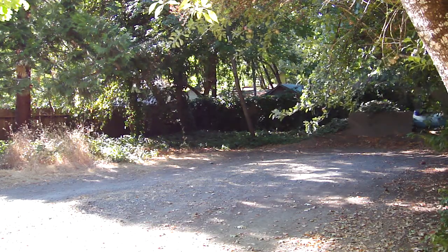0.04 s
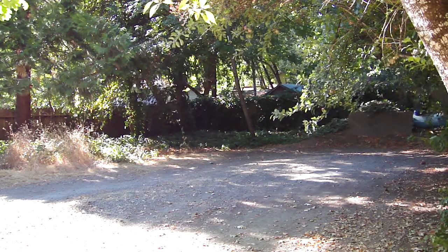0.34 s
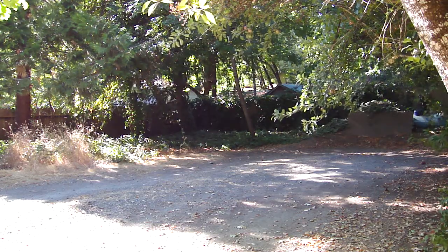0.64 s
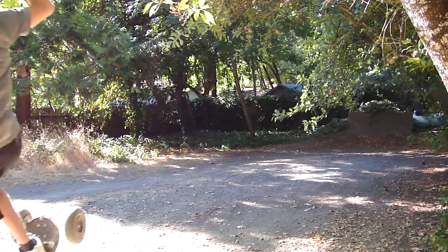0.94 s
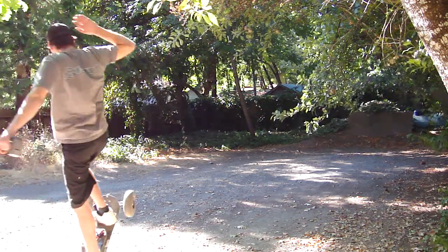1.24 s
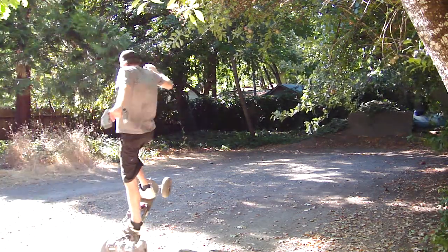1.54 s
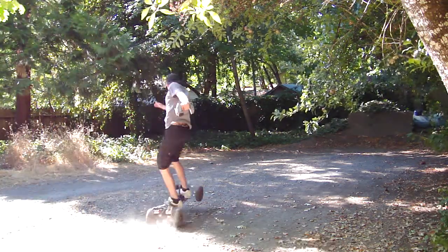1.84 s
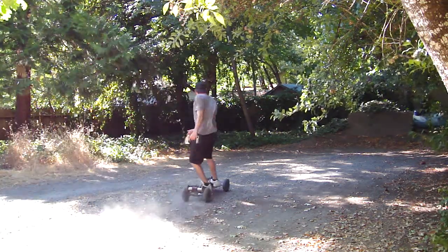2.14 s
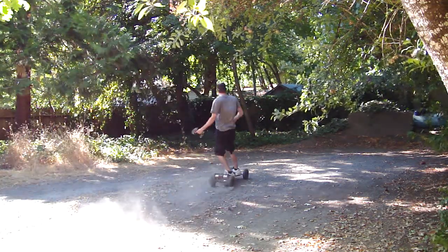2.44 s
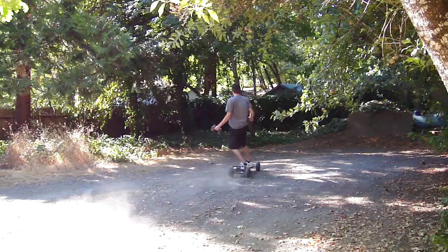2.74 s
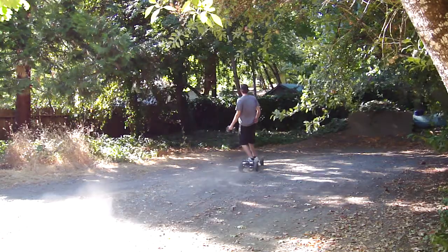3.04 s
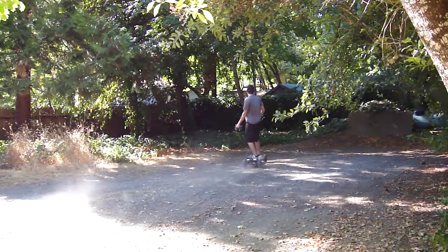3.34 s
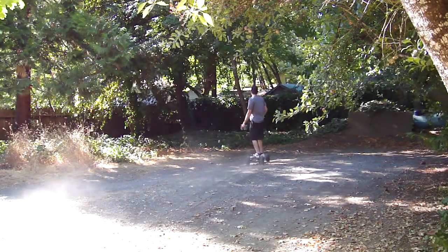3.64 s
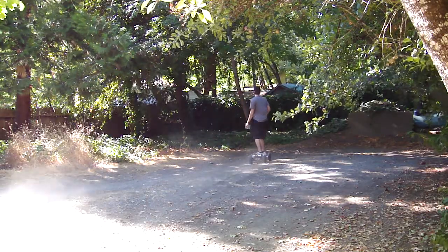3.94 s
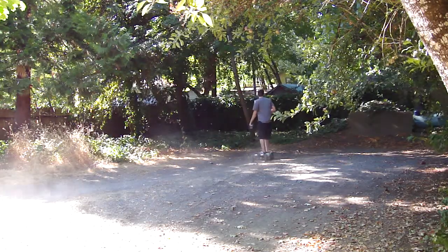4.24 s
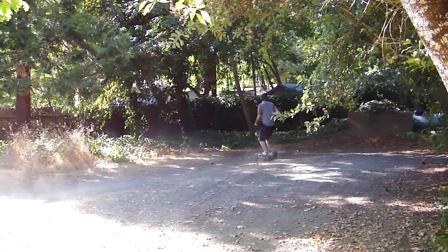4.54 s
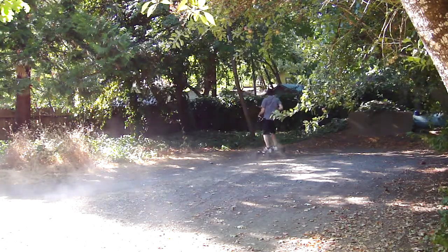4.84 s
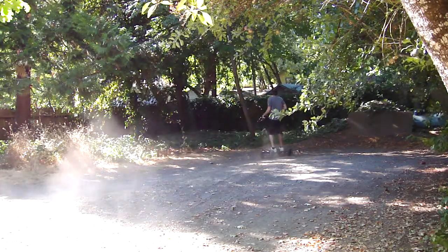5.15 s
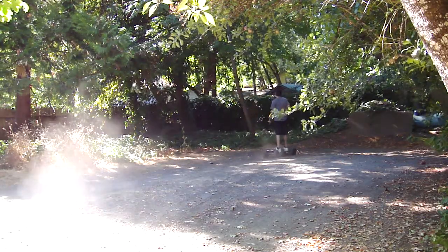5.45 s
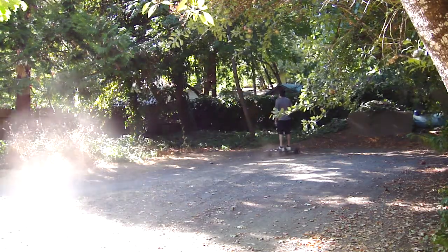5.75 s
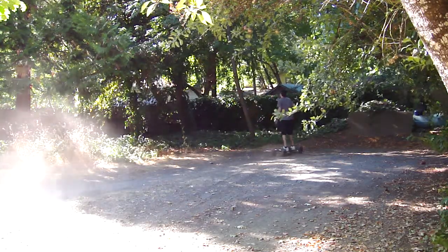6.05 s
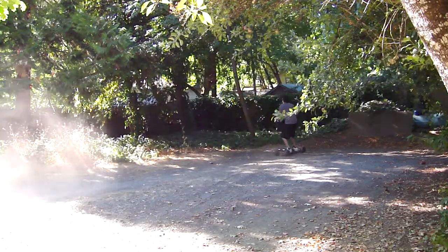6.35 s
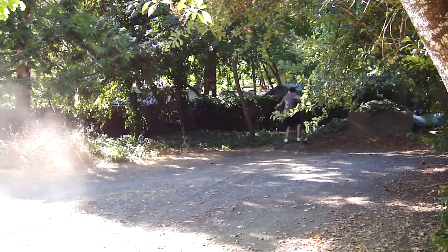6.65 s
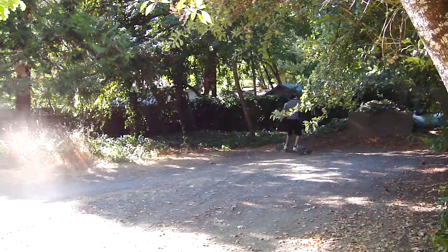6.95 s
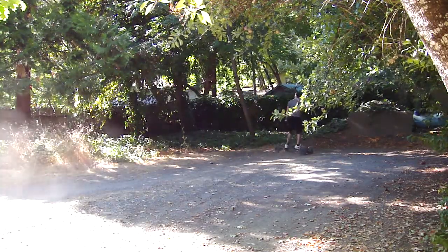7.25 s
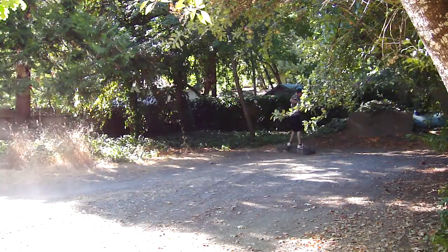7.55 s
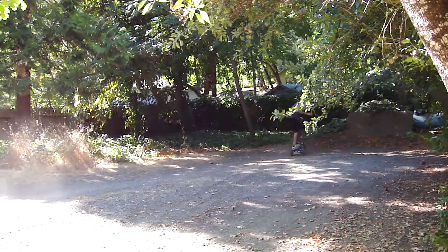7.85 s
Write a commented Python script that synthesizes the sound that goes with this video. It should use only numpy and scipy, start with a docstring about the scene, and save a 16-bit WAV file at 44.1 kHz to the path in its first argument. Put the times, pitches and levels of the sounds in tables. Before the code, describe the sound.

Close by, an electric board accelerates over crunching gravel, whining and clattering into the distance, before feet shift softly on the stones.

```python
"""A gravel lot, one camera microphone, a steady rush in the distance. Close by, an electric mountainboard
pulls away in three main bursts of throttle: the tyres spray stones, the drive whines upward, the deck
clatters, the motor hums and squeals. From about 2 s the speed controller sings in the windings until the
throttle closes, and the board coasts far off. Then a small bird chips, feet shift on the gravel nearby,
pebbles snap and the microphone is bumped. A thin, high flicker near 7.4 and 10 kHz comes and goes."""
import sys
import numpy as np
from scipy import signal
from scipy.fft import rfft, irfft, next_fast_len
from scipy.io import wavfile
from scipy.ndimage import map_coordinates

SR = 44100
rng = np.random.default_rng(int(sys.argv[2]) if len(sys.argv) > 2 else 0)


def unload_audio(sound):
    """Save the sound as a 16-bit wav file, at the path given as the first command line argument."""
    columns = np.transpose(np.atleast_2d(sound))
    # keep every value between -1 and 1, then stretch to whole-number steps
    steps = np.round(np.clip(columns, -1, 1) * 32767)
    wavfile.write(sys.argv[1], SR, steps.astype(np.int16))


N = 357210

# the board rolls past the microphone and away:
# (time [s], rumble [dB], crunch [dB], stone spray [dB], housing rasp [dB])
ROLL = [(0.0, -32, -40.5, -50.5, -57), (.2, -33.5, -38.5, -49.5, -54), (.5, -32.5, -39.5, -46, -48),
        (.6, -30, -37.5, -41.5, -40), (.85, -36, -32.5, -37.5, -31), (1.15, -36, -35, -39, -28.5),
        (2.0, -34.5, -36, -42.5, -31), (2.2, -37.5, -39, -43.5, -28), (2.42, -32, -37, -49.5, -35),
        (2.6, -32.5, -39.5, -52, -59), (2.82, -38, -42.5, -51.5, -71), (3.25, -43, -45, -55, -80),
        (3.55, -52, -71, -56.5, -88), (3.95, -55, -58, -64.5, -90)]
# bursts of throttle: (start [s], end [s], first rasp [dB], last rasp [dB], wheelspin [dB])
BURSTS = [(-.03, 0.021, -39, -47, 5.5), (0.176, 0.43, -25.5, -35.5, 3.5), (0.555, 1.01, -29.5, -35, 4),
          (1.187, 1.873, -25, -26, 2.5), (2.135, 2.262, -38, -26.5, -1.1)]
# spectrum of fine flying stones: (frequency [Hz], level [dB])
SPRAY = [(2000, -6), (4000, 7.5), (5200, -0.5), (6300, 0), (7300, 3), (8300, -0.5), (10000, 0.5),
         (11000, -3.5)]
ATTACK_S, RELEASE_S = 0.012, 0.017  # the drive takes up and drops its load
TIME = np.arange(N) / SR


def amp(db):
    return 10 ** (np.asarray(db) / 20)


def unit(x):
    return x / np.sqrt(np.mean(x ** 2) + 1e-20)


def noise():
    return rng.standard_normal(N)


def curves(rows):
    """One value per sample for each column after the time."""
    times, *columns = np.transpose(rows)
    return [np.interp(TIME, times, column) for column in columns]


def ramp(start, end, first, last):
    """A value that moves steadily from first to last between two times."""
    return first + (last - first) * np.clip((TIME - start) / max(end - start, 1 / SR), 0, 1)


def held(start, end, attack=ATTACK_S, release=RELEASE_S):
    """An envelope that rises at start, holds, and dies away after end."""
    return np.clip((TIME - start) / attack, 0, 1) * np.exp(-np.clip((TIME - end) / release, 0, 20))


def swell(s, rise, fade):
    """An envelope that peaks at s and dies away."""
    t = TIME - s
    return np.exp(-np.minimum(np.where(t < 0, (t / rise) ** 2, t / fade), 20))


def wobble(rate):
    """A smooth random curve, rate knots a second."""
    knots = rng.standard_normal(N // 8)
    return map_coordinates(knots, [TIME * rate], mode="wrap")


def filtered(x, response):
    """x times a response of frequency."""
    size = next_fast_len(N + SR // 2)
    return irfft(rfft(x, size) * response(np.fft.rfftfreq(size, 1 / SR)), size)[:N]


def coloured(x, points):
    """x shaped by (frequency [Hz], level [dB]) points with steep ends, at rms 1."""
    f, db = np.transpose(points)
    edges = np.log(np.r_[f[0] / 10, f[0] / 2, f, f[-1] * 2])
    levels = np.r_[db[0] - 50, db[0] - 20, db, db[-1] - 20]
    return unit(filtered(x, lambda hz: amp(np.interp(np.log(hz + 1), edges, levels))))


def low_cut(x, hz):
    return signal.sosfilt(signal.butter(2, hz, "highpass", fs=SR, output="sos"), x)


def grains(rate, spread_db):
    """Tiny contacts of varied size at random times, about rate a second."""
    size_db = spread_db * np.minimum(rng.exponential(size=N), 4)
    return unit((rng.random(N) < rate / SR) * amp(size_db) * np.sign(noise()))


def tone(hz, rough, width_hz):
    """A steady or gliding line of rms 1; the share rough of it is scattered over width_hz."""
    rough = np.clip(rough, 0, 1)
    phasor = np.sqrt(1 - rough) + np.sqrt(rough / 2) * (wobble(width_hz) + 1j * wobble(width_hz))
    cycles = np.cumsum(np.broadcast_to(hz, N)) / SR + rng.random()
    return np.sqrt(2) * np.real(phasor * np.exp(2j * np.pi * cycles))


def distant_rush():
    """The bed of the lot: a far rush that grows a little late on, with faint ticks of grit."""
    # spectrum of the rush: (frequency [Hz], level [dB])
    air = [(25, -34), (60, -21), (130, -16.5), (280, -10), (450, -4), (650, -1.5), (900, 0), (1200, 0.5),
           (1650, -1.5), (2400, -5), (4000, -17.5), (6300, -26.5), (8000, -28.5), (11000, -32)]
    db = -42.5 + ramp(4.7, 7.3, 0, 2)
    rush = amp(db + 0.36 * wobble(8)) * coloured(noise(), air)
    ticks = amp(-68.5 + 7.6 * wobble(4.48)) * coloured(grains(rate=200, spread_db=2), SPRAY)
    return rush + ticks


def tyres():
    """Knobbly tyres drum on the ground, crush gravel and fling fine stones, more when the wheels spin."""
    # tread drumming on the ground: (frequency [Hz], level [dB])
    tread = [(30, -56), (80, -32.5), (160, -16), (300, -7), (450, -2.5), (680, 2), (1000, -0.5), (1190, 3),
             (1400, -2), (1800, -6), (3000, -35)]
    # gravel crushed under the tread: (frequency [Hz], level [dB])
    gravel = [(500, -5.5), (1100, -7.5), (1600, 1.5), (2200, 2.5), (3000, -2), (4500, -11), (6000, -19.5),
              (9000, -52)]
    rumble_db, crunch_db, spray_db, _ = curves(ROLL)
    spin_db = sum(db * held(start, end) for start, end, *_, db in BURSTS)
    spin_db -= 1.5 * held(1.885, 1.922)  # a hop: the board unweights before it lands
    jolts = wobble(60)
    rumble_db += 0.9 * spin_db + 1.25 + 1.07 * jolts
    rumble = amp(rumble_db) * coloured(grains(rate=900, spread_db=0.5), tread)
    crunch_db += 1.05 * spin_db + 2 + 0.55 * jolts
    crunch = amp(crunch_db) * coloured(grains(rate=3500, spread_db=3), gravel)
    spray_db += spin_db + 6 + 1.4 * wobble(40.5)
    spray = amp(spray_db) * coloured(grains(rate=9000, spread_db=3), SPRAY)
    in_earshot = held(-ATTACK_S, 3.98, release=0.094)  # the tyres sink into the distant rush
    return (rumble + crunch + spray) * in_earshot


def housing():
    """Rapid ticks ring the motor housing, harder in each burst of throttle."""
    # resonances of the housing: (frequency [Hz], level [dB])
    resonances = [(1500, -44), (2500, -11), (3100, 2), (3500, 0), (3850, -1), (4250, -4), (4700, -9),
                  (5400, -16), (6500, -34), (7300, -16), (8200, -30)]
    *_, rolling_db = curves(ROLL)
    load = sum(amp(ramp(start, end, first_db, last_db)) * held(start, end)
               for start, end, first_db, last_db, _ in BURSTS)
    gain = np.hypot(amp(rolling_db - 4.5), amp(-3) * load)
    flutter = amp(0.82 * wobble(140) + 0.46 * wobble(21.57))
    return gain * flutter * coloured(grains(rate=5000, spread_db=2.5), resonances)


def feet():
    """Near the microphone a sole presses the gravel down and grit slides after it."""
    # shifts of the feet: (time [s], weight [dB], grit [dB], rise [s], fade of the weight [s])
    steps = [(.01, -51, -51.5, .01, 0.066), (4.21, -45.5, -45, 0.03, 0.1),
             (4.63, -47.5, -46.5, 0.12, 0.078), (5.02, -40.5, -45.5, 0.055, 0.083),
             (5.7, -63, -54.5, .05, 0.16), (6.31, -62, -52, .012, 0.066), (6.52, -54, -55, .04, 0.055),
             (6.884, -28, -42, 0.0027, 0.011), (6.91, -24.5, -43, 0.0094, 0.014),
             (6.943, -39.5, -45, 0.0089, 0.039), (7.15, -60, -59, .05, .15),
             (7.905, -32.5, -44.5, 0.0086, 0.012), (7.928, -29, -51, 0.0042, 0.014),
             (7.943, -31.5, -48, .003, .012), (7.962, -26.5, -42, 0.0059, 0.01),
             (7.977, -34, -42, 0.0044, 0.065)]
    # gravel under a sole: (frequency [Hz], level [dB])
    sole = [(29, -55), (50, -28), (225, -9), (280, -9.5), (402, -3), (989, -2), (1160, -6), (1260, -5),
            (1800, -7), (6000, -28), (7800, -51), (13200, -120)]
    # sliding grit: (frequency [Hz], level [dB])
    grit_spectrum = [(800, -13), (2000, 5), (3500, 0.5), (5000, -6), (7000, -9), (10500, -10.5)]
    weight = sum(amp(db) * swell(s, rise, fade) for s, db, _, rise, fade in steps)
    slide = sum(amp(db) * swell(s, rise, 1.98 * fade) for s, _, db, rise, fade in steps)
    grit = coloured(grains(rate=2000, spread_db=0.5), grit_spectrum)
    grit += amp(-11) * coloured(grains(rate=240, spread_db=2.5), SPRAY)
    return weight * coloured(grains(rate=3000, spread_db=3.5), sole) + slide * grit


def drive_whine():
    """The drive climbs in steps as the wheel grips and slips; its teeth grate and at speed it frays."""
    # the whine, one curve for each main burst: (time [s], tooth rate [Hz], level [dB])
    climbs = [
        [(0.18, 1017, -31), (0.19, 1028, -15), (0.244, 1099, -22), (0.266, 1149, -15), (0.288, 1177, -18.5),
         (0.3, 1223, -12), (0.338, 1332, -15.5), (0.358, 1335, -22), (0.368, 1340, -20), (0.398, 1330, -21),
         (0.408, 1290, -22), (0.43, 1268, -21), (0.44, 1236, -29)],
        [(0.56, 1100, -24.5), (0.622, 1199, -13), (0.658, 1235, -22.5), (0.682, 1314, -19.5),
         (0.692, 1393, -30), (0.73, 1524, -30), (0.746, 1394, -22), (0.764, 1452, -29), (0.788, 1651, -23),
         (0.824, 1618, -30.5), (0.942, 1732, -33), (0.95, 1787, -35), (1.02, 1749, -48)],
        [(1.2, 1347, -27.5), (1.26, 1475, -32), (1.372, 1404, -32), (1.388, 1568, -40), (1.418, 1470, -31),
         (1.462, 1632, -37), (1.496, 1456, -28.5), (1.548, 1709, -32), (1.566, 1597, -31), (1.618, 1750, -27),
         (1.634, 1642, -28.5), (1.784, 1775, -34), (1.82, 1884, -38)],
    ]
    # the drive is only nudged: (time [s], tooth rate [Hz], level [dB], rise [s], fade [s])
    nudges = [(.02, 1198, -26, 0.017, 0.015), (.503, 1202, -27, .003, .014)]
    hz, db = curves([row for climb in climbs for row in climb])
    gate = sum(held(climb[0][0] - 0.008, climb[-1][0], release=0.0087) for climb in climbs)
    fray = np.interp(hz, [1300, 1500], [0.18, 0.62])
    hz *= 1 + 0.012 * wobble(110)
    line = tone(hz, rough=fray, width_hz=200)
    grate = amp(-13.5) * tone(hz, rough=0.71, width_hz=750)
    octave = amp(-23) * tone(2 * hz, rough=0.91, width_hz=300)
    blips = sum(amp(level) * swell(s, rise, fade) * tone(pitch, rough=0.3, width_hz=200)
                for s, pitch, level, rise, fade in nudges)
    capped_db = np.minimum(db + 1 + 1.8 * wobble(69.6), -14)  # the whine's loudest peaks are capped
    return gate * amp(capped_db) * (line + grate + octave) + blips


def high_flicker():
    """A thin, high flicker near 7.4 and 10 kHz comes and goes."""
    # brief swells of the flicker: (time [s], level [dB], rise [s])
    pulses = [(.06, -48, 0.11), (0.51, -46, .04), (.885, -33, .012), (.95, -37, .02), (1.681, -36, 0.0093),
              (2.005, -41, .012), (2.12, -43, 0.012), (3.873, -60, .03), (4.062, -64, .05), (4.6, -62, .15),
              (5.12, -64, .06), (5.34, -59, 0.14), (6.2, -71, .2), (7.2, -68, .1)]
    envelope = sum(amp(db) * swell(s, rise, rise / 2) for s, db, rise in pulses)
    low = amp(-1 + 4.3 * wobble(70)) * tone(7420, rough=0.77, width_hz=430)
    high = amp(-5 + 4.6 * wobble(70)) * tone(9950, rough=1, width_hz=760)
    return envelope * (low + high)


def deck():
    """Each jolt is a short, dead clack with a ring of its own, a faint rattle and a thud of the tyre."""
    # the deck and axles knock: (time [s], level [dB], ring [Hz])
    knocks = [(.4, -8, 820), (.501, -15, 1200), (.543, -16, 900), (.547, -17, 1100), (.581, -6.5, 970),
              (.596, -12, 1148), (1.95, -7.5, 1340), (1.962, -3, 1338), (2.018, -16, 675),
              (2.038, -18, 530), (2.271, -17.5, 990), (2.32, -15.5, 1030), (2.375, -17, 396),
              (2.423, -17, 990), (2.452, -17, 1500), (2.474, -13, 1200), (2.497, -24, 1120),
              (2.575, -17, 520), (2.6, -14, 870), (2.649, -22, 1190), (2.703, -16.5, 616),
              (2.72, -14.5, 744), (2.783, -19, 1080), (2.835, -13.5, 1160), (2.846, -16, 800),
              (2.856, -24, 640), (2.924, -25, 950), (3.027, -18.5, 860), (3.048, -19.5, 1620),
              (3.077, -18, 1190), (3.108, -18, 680), (3.164, -19, 610), (3.185, -18, 1090),
              (3.205, -19.5, 1400), (3.254, -16.5, 1230), (3.272, -20.5, 520), (3.401, -21.5, 1320),
              (3.424, -23.5, 1040)]
    # the struck deck: (frequency [Hz], level [dB])
    deck_spectrum = [(100, -38), (220, -16), (350, -2), (700, -0.5), (1000, 1), (1190, 2.5), (1450, 0.5),
                     (2200, -3.5), (3200, -8.5), (6000, -21), (11000, -35)]
    # a struck tyre: (frequency [Hz], level [dB])
    tyre_spectrum = [(150, -33), (260, -10.5), (380, -2.5), (600, -5), (900, -1), (1600, -26)]
    blows, thuds, rings = np.zeros((3, N + SR))
    t = np.arange(SR // 5) / SR

    def strike(rise, fade):
        return (1 - np.exp(-(t / rise) ** 2)) * np.exp(-t / fade)

    for s, db, hz in knocks:
        span = slice(round(s * SR), round(s * SR) + len(t))
        rattle = amp(-17) * strike(rise=0.002, fade=0.027)
        blows[span] += amp(db) * (strike(rise=0.001, fade=0.0056) + rattle)
        thuds[span] += amp(min(db, -15)) * strike(rise=0.0017, fade=0.0095)
        ring = np.sqrt(2) * np.sin(2 * np.pi * (hz * t + rng.random()))
        rings[span] += amp(db) * strike(rise=0.0011, fade=0.0066) * ring
    clatter = amp(-10) * blows[:N] * coloured(noise(), deck_spectrum)
    clatter += amp(-13.5) * thuds[:N] * coloured(noise(), tyre_spectrum)
    return low_cut(clatter + amp(-11.5) * rings[:N], hz=130)


def motor_hum():
    """Pulling hardest, the motor hums a low line and its octave, which fades as the board draws away."""
    # hard pulls: (start [s], end [s], first pitch [Hz], last pitch [Hz], level [dB])
    pulls = [(0.602, 1.025, 475, 421.3, -41), (1.198, 1.862, 377.2, 489, -42)]
    octave_gain = ramp(1.4, 1.93, 1.95, 0.44)
    out = np.zeros(N)
    for start, end, first_hz, last_hz, db in pulls:
        hz = ramp(start, end, first_hz, last_hz) * (1 + 0.0181 * wobble(20))
        lines = tone(hz, rough=0.35, width_hz=38) + octave_gain * tone(2 * hz, rough=0.44, width_hz=130)
        out += amp(db) * held(start, end, attack=0.063, release=0.052) * lines
    return out


def drive_squeals():
    """Under full load the drive squeals: a frayed line that swells and climbs."""
    # squeals: (peak time [s], pitch at the peak [Hz], level [dB], rise [s], fade [s])
    squeals = [(.8, 3860, -34, 0.18, .1), (.96, 4060, -25, .05, 0.045), (1.29, 3945, -24.5, 0.057, 0.046),
               (1.54, 3793, -22.5, 0.12, 0.13), (1.69, 4000, -25, 0.097, 0.078)]
    glide_hz_per_s = 830
    waver = 1 + 0.0182 * wobble(80)
    out = np.zeros(N)
    for s, hz, db, rise, fade in squeals:
        pitch = (hz + glide_hz_per_s * np.clip(TIME - s, -0.5, 0.5)) * waver
        core = 0.75 * tone(pitch, rough=0.83, width_hz=390)
        fringe = 0.65 * tone(pitch, rough=0.97, width_hz=1100)
        out += amp(db) * swell(s, rise, fade) * (core + fringe)
    return out


def windings(chop_hz, offset_hz, rough):
    """Chopped current sings in the windings; the turning rotor splits each harmonic into sidebands."""
    # harmonics: (multiple of the chopping rate, lower sideband [dB], centre [dB], upper sideband [dB])
    harmonics = [(1, -38, -16.5, -36), (2, -5, -15, -15.5), (3, -22.5, -26, -21), (4, -34, -29.5, -31)]
    upper_lift_db = np.interp(offset_hz, [180, 320, 520], [0, 3, 11])  # far apart, the main pair evens out
    lower_lift_db = np.interp(offset_hz, [185, 230], [1, -2])  # louder near the shell's ring
    song = np.zeros(N)
    for multiple, lower_db, centre_db, upper_db in harmonics:
        hz = multiple * chop_hz
        away = abs(multiple - 2)  # the second harmonic leads; the others are rougher
        spread_hz = offset_hz if away == 0 else 100 + 0.4 * offset_hz
        lower = tone(hz - spread_hz, rough=rough + 0.3 * away, width_hz=110)
        centre = tone(hz, rough=0.54, width_hz=74)
        upper = tone(hz + spread_hz, rough=np.sqrt(rough) + 0.36 * away, width_hz=150)
        song += amp(lower_db + lower_lift_db) * lower + amp(centre_db) * centre
        song += amp(upper_db + upper_lift_db * (away == 0)) * upper
    # the rotor adds a second pair of lines, 159 Hz inside the main sidebands
    centre_hz = 2 * chop_hz
    inner = sum(tone(centre_hz + side * (offset_hz - 159), rough, width_hz=70) for side in (-1, 1))
    song += amp(np.interp(offset_hz, [220, 330, 520], [-30, -11, -7])) * inner
    # the motor's shell rings once the sidebands close in on it
    shell_db = np.interp(offset_hz, [170, 280, 450, 550], [-12, -9.5, -8, -20])
    song += amp(shell_db) * tone(4025, rough=0.6, width_hz=50)
    # a sizzle lies on either side of the centre
    song += amp(-13 + 12.8 * rough) * tone(centre_hz - offset_hz - 40, rough=1, width_hz=480)
    song += amp(-10.5 + 3.9 * rough) * tone(centre_hz + 150, rough=0.89, width_hz=420)
    return song


def controller():
    """The speed controller sings until the throttle closes; brief dropouts of current make it buzz."""
    # the song: (time [s], sideband offset [Hz], level [dB], roughness [0-1], dropout depth [0-1])
    course = [(2.15, 620, -36, .2, .1), (2.25, 505, -28, .2, .15), (2.3, 465, -34, 0.4, .2),
              (2.5, 310, -32, 0.65, 0.2), (2.8, 265, -32.5, 0.67, 0.2), (3.1, 220, -33.5, 0.75, .3),
              (3.18, 196.7, -31, 0.42, 0.3), (3.6, 166.8, -33, 0.13, 0.26), (3.81, 138, -34, 0.1, 0.6)]
    chop_hz, buzz_hz = 1955, 51
    open_s, close_s = 2.13, 3.81
    offset_hz, db, rough, depth = curves(course)
    song = windings(chop_hz, offset_hz, rough)
    cycle = np.cumsum(buzz_hz + 3.5 * wobble(25)) / SR % 1
    dropout = np.exp(-(np.minimum(cycle, 1 - cycle) / 0.16) ** 4)
    song *= 1 - depth * dropout
    # before each dropout a pair of chirps flies apart
    flick_hz = offset_hz + 708 * cycle ** 3
    falling = amp(0.5) * tone(2 * chop_hz - 1.3 * flick_hz, rough=0.4, width_hz=400)
    rising = tone(2 * chop_hz + 0.8 * flick_hz, rough=0.4, width_hz=400)
    song += amp(-6) * np.sqrt(depth) * np.sin(np.pi * cycle ** 2) * (falling + rising)
    throttle = held(open_s, close_s, release=0.007)
    echo = amp(-11.5) * held(open_s, close_s, release=0.085)  # the song lingers in the trees
    return np.maximum(throttle, echo) * amp(db + 0.54 * wobble(35.7)) * song


def bird_chip():
    """Off in the trees, one small bird's falling chip."""
    chip_s = 4.189
    hz = ramp(chip_s, chip_s + 0.02, 4520, 3410)
    return amp(-38) * swell(chip_s, rise=0.003, fade=0.024) * tone(hz, rough=0.76, width_hz=1400)


def pebbles():
    """Each stone cracks in a broad band around its short ring; the smallest hardly ring."""
    # single pebbles snap: (time [s], level [dB], ring [Hz])
    stones = [(4.221, -28, 6200), (4.445, -25.5, 2650), (4.566, -30, 3600), (4.654, -26, 8600),
              (4.949, -18, 1070), (4.998, -18.5, 2610), (4.999, -20, 5000), (5.034, -24, 7040),
              (5.302, -35, 4100), (5.372, -32, 9800), (5.401, -32, 9000), (5.663, -30, 8800),
              (5.703, -36, 5500), (5.762, -34, 7000), (6.298, -27, 8000), (6.35, -35, 8000),
              (6.424, -33, 9500), (6.528, -36, 7500), (7.166, -31, 10000), (7.291, -32, 9000),
              (7.975, -27, 5000)]
    snaps, t = np.zeros(N + SR), np.arange(SR // 20) / SR
    for s, db, hz in stones:
        band = signal.butter(2, [hz / 1.6, hz * 1.6], "bandpass", fs=SR)
        crack = unit(signal.lfilter(*band, rng.standard_normal(len(t))))
        ring = np.interp(hz, [2500, 7000], [1, 0.25]) * np.sin(2 * np.pi * hz * t)
        t60 = np.interp(hz, [2500, 8000], [0.02, 0.011])
        snaps[round(s * SR):][:len(t)] += amp(db - 6.5 - 60 * t / t60) * (ring + 0.53 * crack)
    return snaps[:N]


def microphone_bumps():
    """Handling noise: one low push of the microphone for each bump; softer ones are duller."""
    # soft bumps: (time [s], level [dB])
    bumps = [(5.164, -50), (5.275, -31), (5.808, -41), (5.855, -34.5), (5.987, -47), (6.099, -47),
             (6.144, -48), (6.549, -35), (6.562, -42), (6.581, -38.5), (6.624, -47), (6.658, -48),
             (7.664, -44)]
    pushes = np.zeros(N)
    for s, db in bumps:
        hz = np.interp(db, [-50, -33], [90, 155])
        envelope = swell(s + 0.0041, rise=0.0025, fade=0.0021)
        pushes += amp(db) * envelope * np.sin(2 * np.pi * hz * (TIME - s))
    return amp(4) * low_cut(pushes, hz=70)


def scene():
    """The board, the ground nearby and the far background, all at one microphone."""
    drive = drive_whine() + motor_hum() + drive_squeals()
    board = drive + housing() + controller() + tyres() + deck()
    nearby = feet() + pebbles() + microphone_bumps()
    return (board + nearby + bird_chip() + high_flicker() + distant_rush())[None]


def record(dry):
    """The camera keeps nothing above its band limit."""
    return filtered(dry[0], lambda hz: hz < 11050)[None]


dry = scene()
out = record(dry)
unload_audio(out)
```